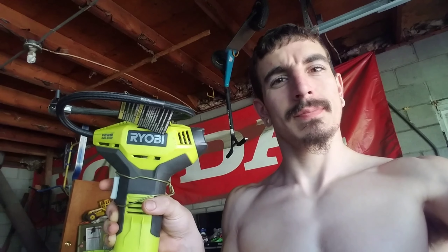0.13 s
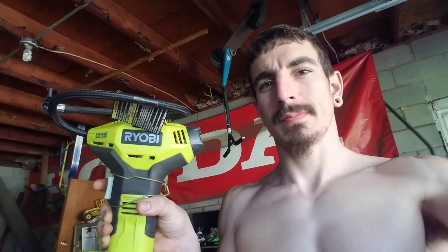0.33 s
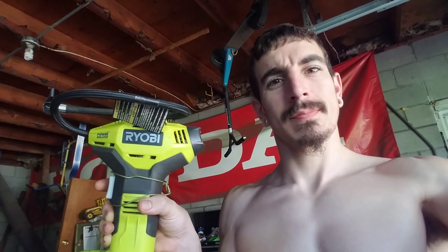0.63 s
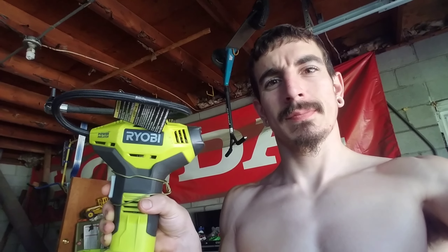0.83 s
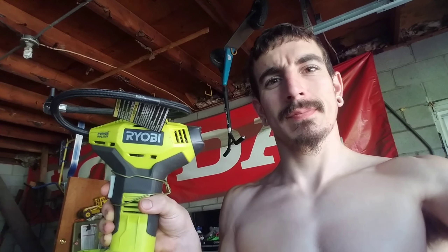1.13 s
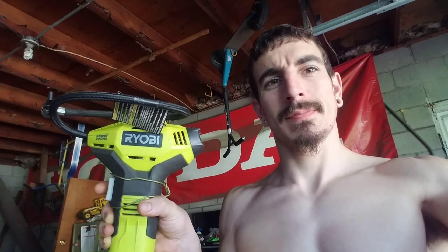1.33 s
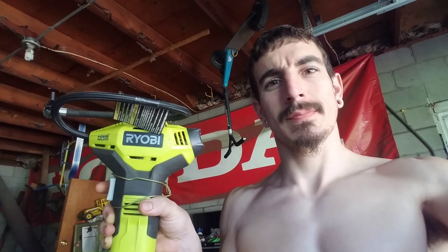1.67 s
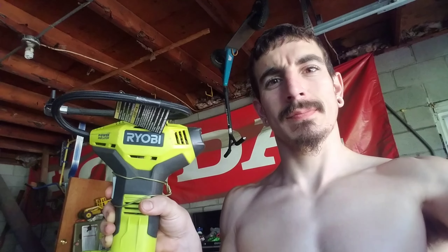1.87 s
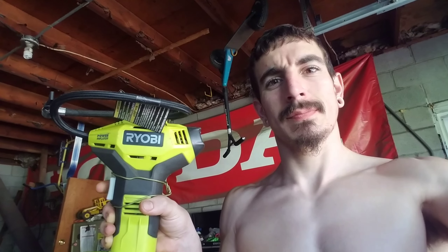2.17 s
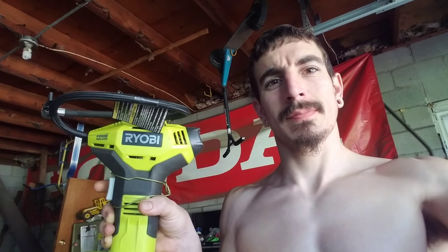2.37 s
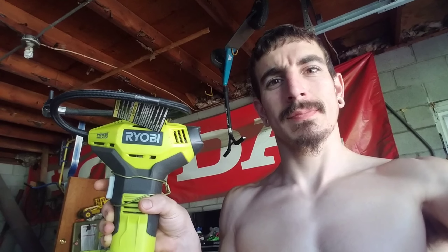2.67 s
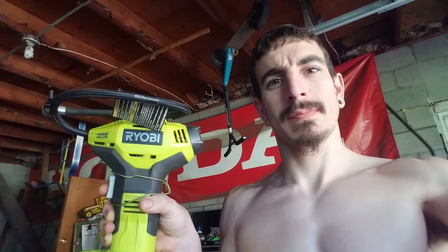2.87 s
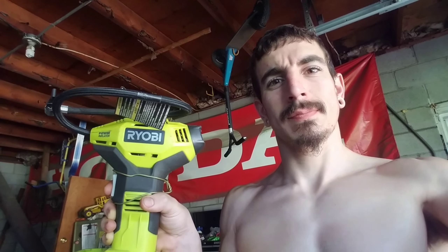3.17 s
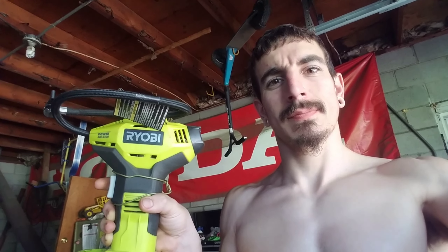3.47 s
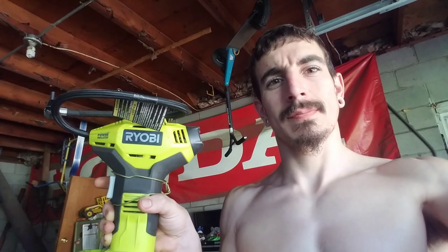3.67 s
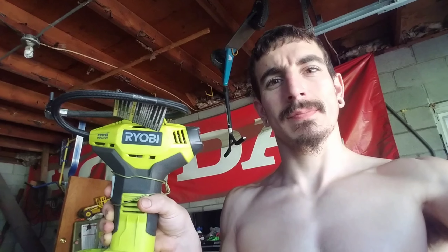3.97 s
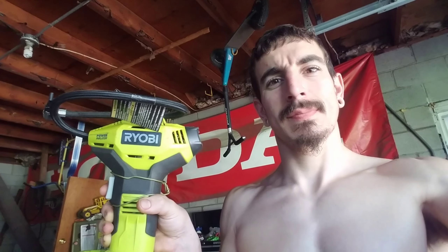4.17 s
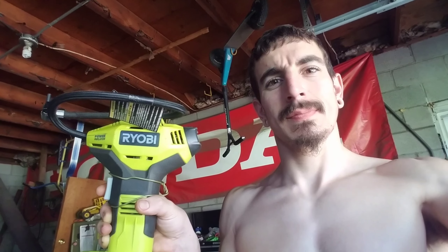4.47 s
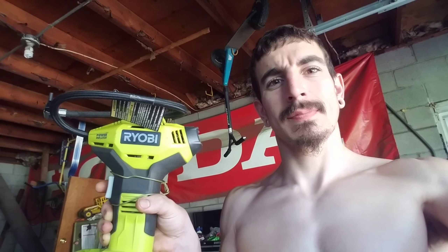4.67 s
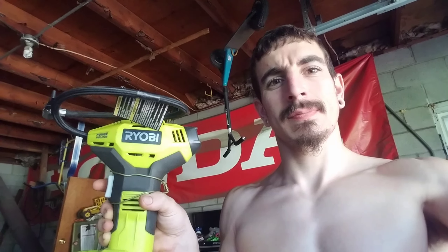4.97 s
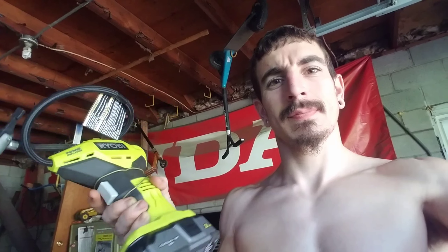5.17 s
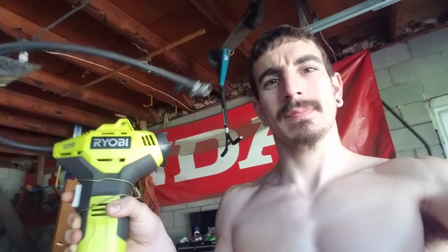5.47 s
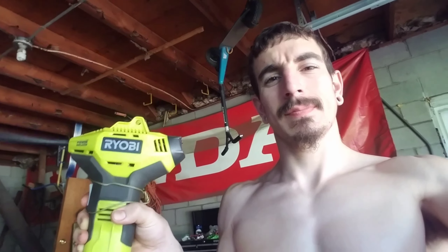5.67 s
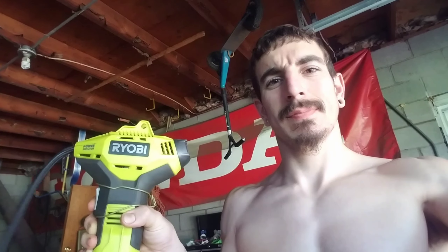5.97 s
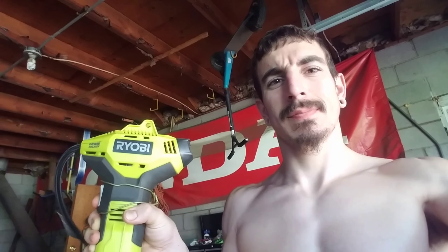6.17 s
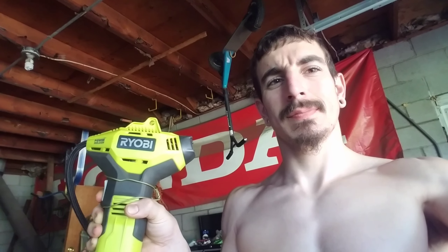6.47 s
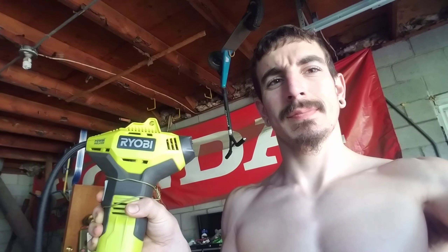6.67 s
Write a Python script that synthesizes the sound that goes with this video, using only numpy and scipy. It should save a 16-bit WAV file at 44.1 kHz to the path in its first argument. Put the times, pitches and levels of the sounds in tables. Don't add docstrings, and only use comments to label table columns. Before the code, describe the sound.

A small air pump stutters in short bursts very near a stereo microphone: click, hard buzzing puffs, strokes spacing out, rotor coasting to near silence. It repeats five times at uneven lengths. The tool rustles and rumbles in the hand, then clicks on as a different, smoother sound: a high-speed blower rising almost instantly to a bright airy whine. Short garage reflections and low background hum surround it.

```python
import sys
import numpy as np
from scipy import signal
from scipy.fft import rfft, irfft, next_fast_len
from scipy.io import wavfile
from scipy.ndimage import uniform_filter1d

SR = 44100
rng = np.random.default_rng(int(sys.argv[2]) if len(sys.argv) > 2 else 0)


def store_wav(level_fs):
    pcm = np.round(np.clip(np.atleast_2d(level_fs), -1, 1) * 32767)
    wavfile.write(sys.argv[1], SR, pcm.T.astype(np.int16))


def gain_from_db(level_db):
    decades = np.asarray(level_db, float) / 20
    return 10 ** decades


N = 300304
T = np.arange(N) / SR
SIZE = next_fast_len(N + 4096)
HZ = np.fft.rfftfreq(SIZE, 1 / SR)

# pitch_hz, likeness [0..1]
PORT_LIKENESS = [(60, 0.99), (400, 0.93), (1500, 0.93), (3500, 0.58), (6000, 0.32), (15000, 0.14)]
# pitch_hz, left_minus_right_db
PORT_BALANCE = [(60, 3.5), (110, 0), (200, -0.5), (380, -0.5), (700, -5.5), (1290, -3.5), (2380, 7),
                (4400, -8), (8120, -10.5), (15000, -6.5)]
# pitch_hz, delay_ms
PORT_DELAY = [(300, 0.35), (1400, 0.12), (2500, 0.25), (16000, 0.297)]

# time_s, level_db
HUM_LEVEL = [(0, -50), (2.0, -50.5), (2.85, -52.5), (3.13, -41), (3.25, -55), (4.75, -52.5), (5.4, -42.5),
             (6.81, -42)]
# multiple [-], level_db
BELT_LINES = [(11.14, -22), (15, -15), (16, -12), (18, -15), (19, -12), (20, -20), (21, -13), (22, -17),
              (23, -24)]
# pitch_hz, density_db [dB per Hz]
ROOM_TONE = [(12, -52), (20, -26.5), (86, -3), (270, -26), (825, -25), (1060, -29), (1220, -28.5),
             (1400, -30.5), (8890, -47), (13900, -48), (16000, -53)]
# time_s, level_db
SCRAPE_LEVEL = [(4.88, -87), (5.0, -72), (5.13, -69.5), (5.27, -66.5), (5.45, -63.5), (5.49, -62.5),
                (5.53, -64.5), (5.75, -71)]
# time_s, level_db
RUMBLE_LEVEL = [(4.88, -71), (5.06, -61.5), (5.25, -54), (5.75, -50.5)]
# pitch_hz, density_db [dB per Hz]
HANDLING_COLOUR = [(53, -33.5), (90, -2), (272, -24), (457, -26.5), (488, -31), (839, -28.5), (1110, -33),
                   (1210, -38), (1910, -37.5), (3150, -39), (7500, -43), (12800, -40.5), (15000, -40)]

# start_s, length_s, start_hz, end_hz, level_db
WHISTLES = [
    (0, .06, 1950, 1950, -47),
    (.12, .11, 2500, 2230, -43),
    (.285, .125, 2570, 1730, -42.5),
    (.35, .05, 1050, 900, -51),
    (1.43, .05, 1000, 870, -59),
    (1.57, .07, 620, 500, -65),
    (3.64, .13, 1330, 800, -59),
]
# start_s, length_s, pitch_hz, level_db
HISSES = [
    (1.875, .15, 8350, -34),
    (3.08, .09, 8400, -33),
    (5.75, .11, 3700, -33),
    (6.08, .03, 8400, -38),
    (6.275, .03, 8400, -41),
    (5.465, .04, 3250, -60),
]
# start_s, length_s, pitch_hz
CHIRPS = [
    (.73, .08, 13520),
    (4.9, .05, 13300),
    (5.19, .06, 13200),
    (5.3, .07, 13400),
    (5.69, .04, 13180),
]
# time_s, peak_db, pitch_hz
SWITCH_CLICKS = [
    (0.116, -5, 3320),
    (0.553, -12, 3350),
    (0.958, -20, 3150),
    (1.846, -24, 3730),
    (3.014, -31, 3180),
    (4.014, -28.5, 1290),
    (4.032, -22.5, 3150),
    (4.056, -1, 3300),
    (5.725, -27, 3040),
    (5.741, -14.5, 3270),
]

# time_s, shaft_hz
FAN_SHAFT = [(5.742, 154), (5.794, 250), (5.828, 290), (5.85, 306), (5.892, 323), (5.94, 331), (6, 334.2),
             (6.14, 335.4), (6.81, 335.3)]
# pitch_hz, level_db
FAN_WHINE = [(2008, -51), (2347, -32), (2681, -43), (3015, -41.5), (4689, -42), (5028, -50), (6708, -56),
             (7041, -45), (7375, -50), (8710, -61), (9049, -58), (9388, -59), (10045, -59), (11063, -49),
             (11396, -41), (11719, -51), (12069, -53), (12403, -52), (12737, -54), (13060, -46),
             (13410, -47), (13744, -43), (14077, -51), (14416, -52), (14756, -56), (15073, -51),
             (15407, -44), (15741, -49)]
# pitch_hz, density_db [dB per Hz]
FAN_AIR = [(59, -35), (100, -5.5), (193, -15), (328, -9), (481, -12.5), (1030, 2.5), (1800, -1.5),
           (2320, 1), (4470, -14.5), (4770, -13.5), (6290, -12.5), (7290, -14), (8830, -25.5),
           (11400, -15.5), (16000, -11)]
# pitch_hz, width_hz, level_db
FAN_DUCT = [(1067, 160, -1.5), (11500, 230, -6.5), (13600, 500, -8), (15300, 160, 12)]

# time_s, air_rush_db
PULLS = [
    [(0, -43.5), (.05, -36), (.104, -37), (.118, -24.5), (.27, -29.5), (.37, -38), (.5, -49), (.615, -42),
     (.7, -73)],
    [(.956, -35), (.985, -24.5), (1.2, -27), (1.28, -25.5), (1.4, -31.5), (1.43, -35.5), (1.62, -42.5),
     (1.69, -52.5), (1.84, -67)],
    [(1.846, -48), (1.862, -29), (1.92, -32), (2.05, -24), (2.35, -30), (2.385, -43), (2.75, -51.5),
     (2.83, -59.5), (2.9, -80)],
    [(3.014, -40.5), (3.08, -28), (3.19, -23.5), (3.44, -28.5), (3.53, -43), (3.72, -52.5), (3.79, -44),
     (3.82, -63.5), (3.92, -83)],
    [(4.03, -46.5), (4.06, -24.5), (4.11, -25.5), (4.33, -30), (4.4, -44), (4.66, -47.5), (4.82, -59),
     (4.85, -61), (4.89, -84.5)],
]
# time_s, level_db, rise_s, fall_s
VENTS = [
    (.002, -21.5, 0.0032, 0.0045),
    (.055, -33, 0.0027, .004),
    (.388, -22, .007, 0.0038),
    (.463, -28, .014, 0.0057),
    (.559, -37, 0.0044, 0.0057),
    (1.641, -32, 0.013, .011),
    (1.863, -27, 0.0019, 0.004),
    (3.777, -42.5, 0.051, 0.0091),
    (2.357, -23.5, 0.0012, 0.0043),
    (4.361, -32.5, .002, 0.0042),
]
# time_s, strokes up to the next row [count], strength_db over the rush
STROKES = [(0.135, 2, 6.5), (.187, 2, 8.5), (.242, 1, 11), (0.266, 1, 8.5), (0.996, 2, 9), (1.046, 4, 8.5),
           (1.13, 7, 10), (1.274, 2, 4.5), (1.325, 2, 10), (1.399, 1, 10), (1.47, 1, 7), (2.013, 1, 5),
           (2.047, 8, 5.5), (2.206, 2, 9), (2.247, 1, 8.5), (2.277, 1, 8.5), (2.322, 1, 11.5),
           (3.181, 8, 5.5), (3.337, 2, 7.5), (3.382, 1, 10.5), (3.41, 2, 14.5), (3.484, 1, 17),
           (4.078, 2, 6.5), (4.128, 5, 10.5), (4.236, 1, 6), (4.256, 1, 11), (4.285, 2, 12), (4.36, 1, 8.5)]
# start_s, stop_s, first_rattle_hz, rattle_depth_db, first_hum_db
COASTS = [
    (.48, .72, 60, 2, -60),
    (1.42, 1.82, 75, 3, -61),
    (2.385, 2.86, 84, 5, -51),
    (3.5, 3.84, 84, 3, -57),
    (4.39, 4.87, 84, 5, -54),
]
# pitch_hz, density_db [dB per Hz]
PUMP_AIR = [(120, -38), (200, -19), (340, -17.5), (590, -14.5), (821, -14), (1040, -10), (1550, -11.5),
            (2380, -4), (2960, -8.5), (3310, -6.5), (4680, -14), (5230, -9), (8420, -13.5), (9400, -17),
            (14100, -6), (16000, -4.5)]
# pitch_hz, width_hz, level_db
HOUSING = [(2310, 52, -17), (3266, 233, 6.5), (5170, 140, -7.5), (7040, 530, 5.5), (11250, 1500, 1),
           (13400, 720, 3)]
# pitch_hz, width_hz, level_db
BODY_MODES = [(145.7, 92, -7), (264, 53, -8), (414, 110, -7)]


def evened(x):
    return x / np.sqrt(np.mean(x ** 2) + 1e-20)


def read(points):
    hz, value = np.transpose(points)
    return np.interp(np.log(HZ + 1), np.log(hz + 1), value)


def band(lo_hz, hi_hz):
    below = 1 + (lo_hz / (HZ + 1)) ** 8
    above = 1 + (HZ / hi_hz) ** 8
    return 1 / np.sqrt(below * above)


def shaped(x, gain):
    return irfft(rfft(x, SIZE) * gain, SIZE)[..., :N]


def resonate(x, hz, width):
    r = np.exp(-np.pi * width / SR)
    poles = [2, -4 * r * np.cos(2 * np.pi * hz / SR), 2 * r * r]
    return signal.lfilter([1 - r * r, 0, r * r - 1], poles, x)


def wander(rate_hz):
    return evened(shaped(rng.standard_normal(N), band(1.5, rate_hz)))


def at_ports(x, tones=False):
    late = np.exp(-2j * np.pi * HZ * read(PORT_DELAY) / 1000)
    ports = np.array([late, 1 + 0 * late]) * gain_from_db(read(PORT_BALANCE) * [[.5], [-.5]])
    between = np.maximum(abs(ports.mean(0)), .5) if tones else 1
    return shaped(x, ports / between)


def air_noise(likeness=0.96):
    same = np.clip(likeness * read(PORT_LIKENESS), 0, 1)
    shared = shaped(rng.standard_normal(N), np.sqrt(same))
    return shared + shaped(rng.standard_normal((2, N)), np.sqrt(1 - same))


def patchy(x, depth_db):
    z = signal.stft(x, nperseg=256)[2]
    field = rng.standard_normal(z.shape[1:])
    field = uniform_filter1d(field, size=4, axis=0)
    field = evened(uniform_filter1d(field, size=5, axis=1))
    return signal.istft(z * gain_from_db(depth_db * field), nperseg=256)[1][:, :N]


def curve_gain(s, db):
    return gain_from_db(np.interp(T, s, db)) * (T >= s[0]) * np.clip((s[-1] - T) / 0.0086, 0, 1)


def appliance():
    belt_hz, slap_s, twist_rad = 4.228, .18, 1.44
    belt = 2 * np.pi * belt_hz * (T - slap_s)
    hum = np.cos(17 * belt)
    for k, db in BELT_LINES:
        hum = hum - gain_from_db(db) * np.cos(k * belt + twist_rad * (k - 17) ** 2)
    hum = hum * gain_from_db(1.0 + 1.1 * wander(10))
    hum = hum * gain_from_db(np.interp(T, *np.transpose(HUM_LEVEL)) + [[1], [-1]])
    buzz = gain_from_db(-70.5) * evened(resonate(rng.standard_normal(N), 1195, 25))
    return hum + buzz


def room_tone():
    tone = shaped(air_noise(0.74), gain_from_db(read(ROOM_TONE)))
    return tone * gain_from_db(-63.5) / np.std(shaped(tone, band(150, 16000)))


def handling():
    grains = air_noise(.4) * gain_from_db(1.2 * wander(40))
    rustle = shaped(grains, gain_from_db(read(HANDLING_COLOUR)))
    scrape = evened(shaped(rustle, band(1280, 21000)))
    rumble = evened(shaped(rustle, band(126, 1600)))
    scrape = gain_from_db(6.0) * curve_gain(*np.transpose(SCRAPE_LEVEL)) * gain_from_db(2.1 * wander(21)) * scrape
    return scrape + curve_gain(*np.transpose(RUMBLE_LEVEL)) * rumble


def garage():
    return appliance() + room_tone() + handling()


def walls(x, t60=0.34):
    t = np.arange(SR // 2) / SR
    sign = rng.choice([-1., 1.], (2, len(t)))
    sparse = rng.random((2, len(t))) < .05
    taps = sign * sparse * gain_from_db(-60 * t / t60) * (t > .004)
    return signal.oaconvolve(x, taps / np.linalg.norm(taps[0]), axes=1)[:, :N]


def squeaks():
    out = np.zeros(N)
    whistle_width_hz, hiss_width_hz, chirp_db = 50, 380, -83
    rows = [(*row, whistle_width_hz) for row in WHISTLES]
    rows += [(s, d, hz, hz, db, hiss_width_hz) for s, d, hz, db in HISSES]
    rows += [(s, d, hz, hz, chirp_db, whistle_width_hz) for s, d, hz in CHIRPS]
    for s, length, start_hz, end_hz, db, width in rows:
        hz = np.linspace(start_hz, end_hz, round(length * SR))
        blur = evened(uniform_filter1d(rng.standard_normal(8000), round(SR / width)))[:len(hz)]
        steady = 3 * (width < 100)
        carrier = np.sin(2 * np.pi * np.cumsum(hz) / SR)
        tone = (steady + blur) * carrier * signal.windows.tukey(len(hz), .3)
        out[round(s * SR):][:len(hz)] += gain_from_db(db) * tone
    return at_ports(out, tones=True)


def switch():
    t, out = np.arange(600) / SR, np.zeros(N + 600)
    for s, db, hz in SWITCH_CLICKS:
        tick = rng.standard_normal(600)
        if db < -24:
            tick = 3 * resonate(resonate(tick, hz, hz), hz, hz)
        ring = np.sin(2 * np.pi * hz * t) * np.exp(-t / .0016)
        click = tick * np.exp(-t / .002) + ring
        out[round(s * SR):][:600] += gain_from_db(db - 13.0) * click
    return at_ports(out[:N])


def fan_whine(turns, missing):
    full_speed_hz = 335.2
    whine = np.zeros(N)
    for hz, db in [(335, -53)] + list(FAN_WHINE):
        waver_db = (1.6 if hz < 4000 else 1.4) * wander(20)
        growth_db = -(110 if hz < 12000 else 50) * missing
        line_db = db - (hz < 4000) * 1.3 - (2500 < hz < 3200) * 1.5 + waver_db + growth_db
        phase = round(hz / full_speed_hz) * turns + rng.random()
        whine += gain_from_db(line_db) * np.sin(2 * np.pi * phase)
    whine *= gain_from_db(5.5) * (T > FAN_SHAFT[0][0])
    return at_ports(whine, tones=True)


def fan():
    shaft_hz = np.interp(T, *np.transpose(FAN_SHAFT))
    turns = np.cumsum(shaft_hz * (1 + .0009 * wander(25))) / SR
    missing = 1 - shaft_hz / 335.2
    whine = fan_whine(turns, missing)
    throb = 1 + 0.19 * np.cos(2 * np.pi * turns)
    air = patchy(air_noise(), 0.93) * throb * gain_from_db(0.42 * wander(180))
    air = air + sum(gain_from_db(db) * resonate(air, hz, width) for hz, width, db in FAN_DUCT)
    air = at_ports(shaped(air, gain_from_db(read(FAN_AIR))))
    roar = evened(shaped(air, band(73, 1060)))
    hiss = evened(shaped(air, band(1620, 14600)))
    since = T - FAN_SHAFT[0][0]
    effort = gain_from_db(-13.5 * missing - 1. * since) * (since > 0)
    fizz = gain_from_db(-25) * np.exp(-abs(since) / 0.24) * evened(shaped(air, band(9600, 20000)))
    return effort * (gain_from_db(-25.5) * hiss + gain_from_db(-33.5) * roar + fizz) + whine


def rush_db():
    level = sum(curve_gain(*np.transpose(rows)) for rows in PULLS)
    for s, db, rise, fall in VENTS:
        level = level + gain_from_db(db) * np.exp(-abs(T - s) / np.where(T < s, rise, fall))
    return 20 * np.log10(level + 1e-7)


def stroke_trains(level_db):
    thump_db, lazy_thump_db = -4.5, -9
    s, count, puff_db = np.transpose(STROKES)
    number = np.cumsum(np.round(count)) - np.round(count)
    each = np.arange(number[-1] + 1)
    luck = rng.standard_normal((len(each), 2))
    when = np.interp(each, number, s)
    at = np.round(when * SR).astype(int)
    gap = np.minimum(np.diff(when, prepend=-1), 2 * np.diff(when, append=9))
    slow = np.clip((gap - .025) / 0.086, 0, 1)
    puff = np.maximum(gain_from_db(np.interp(each, number, puff_db) + .9 * luck[:, 0]) - 1, 0)
    blow = gain_from_db(level_db[at] + thump_db + lazy_thump_db * slow + .6 * luck[:, 1])
    trains = np.zeros((3, N))
    trains[:, at] = [(1 - slow) * puff, slow * puff, blow]
    return trains


def coasting():
    slowing_s, fade_db_per_s = .33, 30
    throb_db, hum = np.zeros(N), np.zeros(N)
    for start, stop, rate, depth_db, hum_db in COASTS:
        inside = (T > start) & (T < stop)
        rattle_hz = rate * np.exp((start - T) / slowing_s) * (1 + .015 * wander(30))
        turns = np.cumsum(inside * rattle_hz) / SR
        throb_db += inside * depth_db * np.cos(np.pi * turns) ** 6
        broken = gain_from_db(-3 + 2.5 * wander(8))
        teeth = sum(np.sin(2 * np.pi * 6 * k * turns) for k in range(2, 6))
        teeth = teeth + 7 * rng.standard_normal(N)
        body = gain_from_db(8) * resonate(resonate(teeth, 490, 90), 490, 90)
        fade = curve_gain([start, stop], [hum_db, hum_db - fade_db_per_s * (stop - start)])
        hum += fade * (broken * np.sin(2 * np.pi * 6 * turns) + body)
    return throb_db, hum


def pump():
    level_db = rush_db()
    quick, slow, blows = stroke_trains(level_db)
    t = np.arange(-2000, 2001) / SR
    puffs = np.zeros(N)
    for train, rise_s, fall_s in [(quick, .004, .0035), (slow, .012, .006)]:
        puff = np.where(t < 0, np.exp(t / rise_s), np.exp(-t / fall_s))
        puffs += signal.oaconvolve(train, puff, "same")
    throb_db, hum = coasting()
    pulsing = (1 + puffs) * gain_from_db(throb_db + 1.9 * wander(400))
    pulsing /= np.sqrt(uniform_filter1d(pulsing ** 2, 3500))
    air = patchy(air_noise(), 2.2) * pulsing
    air = air + sum(gain_from_db(db - 6.0) * resonate(air, hz, width) for hz, width, db in HOUSING)
    air = at_ports(shaped(air, gain_from_db(read(PUMP_AIR))))
    low = evened(shaped(air, band(120, 1573)))
    mid = evened(shaped(air, band(1500, 4240)))
    high = evened(shaped(air, band(4500, 19000)))
    over_db = level_db + 30
    rush = gain_from_db(1.5) * mid + gain_from_db(5 + .22 * over_db) * high + gain_from_db(-6.5 - .13 * over_db) * low
    thump = sum(gain_from_db(db) * SR / (np.pi * width) * resonate(blows, hz, width) for hz, width, db in BODY_MODES)
    return gain_from_db(level_db) * rush + at_ports(thump + hum)


def scene():
    tool = pump() + fan() + switch() + squeaks()
    return tool + gain_from_db(-9.5) * walls(tool) + garage()


def band_limit(x):
    return signal.sosfilt(signal.butter(12, 16810, fs=SR, output="sos"), x)


def record(dry):
    edge = signal.firwin(1201, 15730, window=("kaiser", 6), fs=SR)
    limited = signal.oaconvolve(.9 * np.tanh(dry / .9), edge[None], "same")
    return band_limit(limited)


dry = scene()
out = record(dry)
store_wav(out)
```